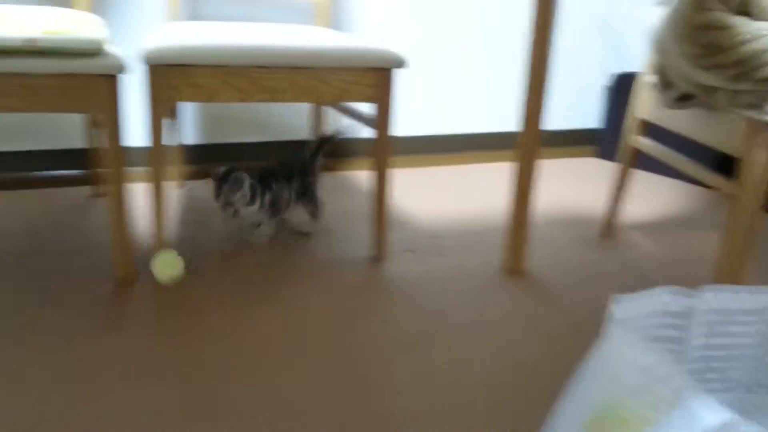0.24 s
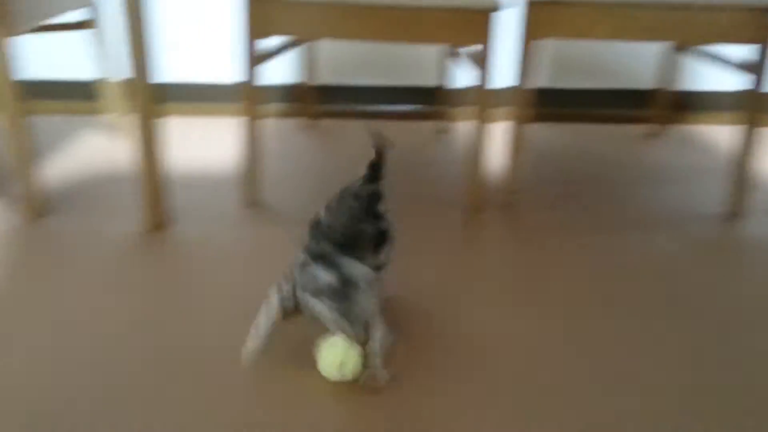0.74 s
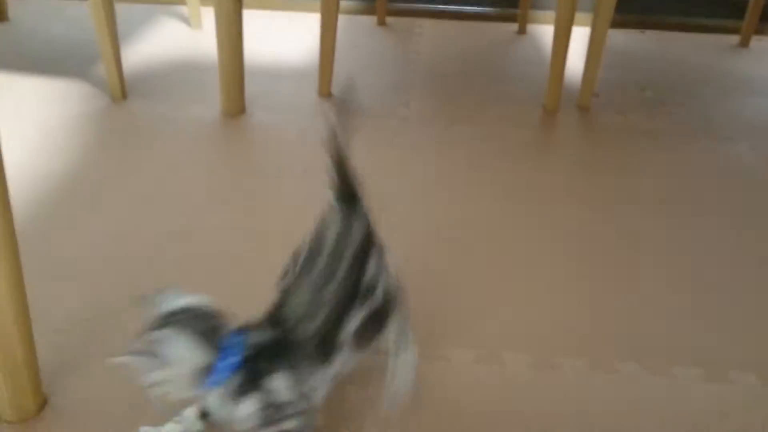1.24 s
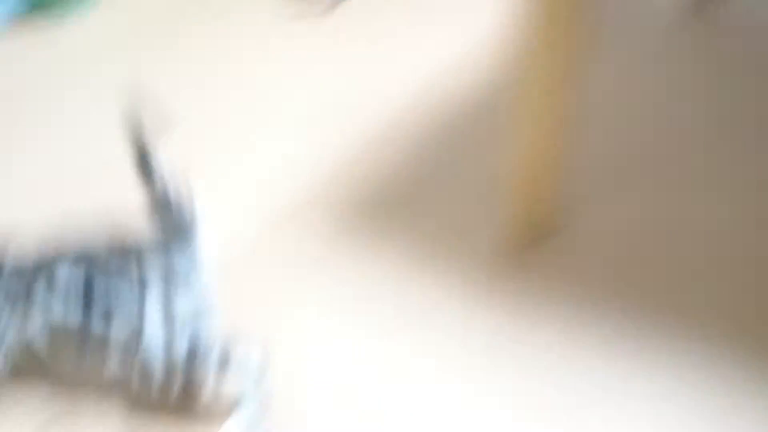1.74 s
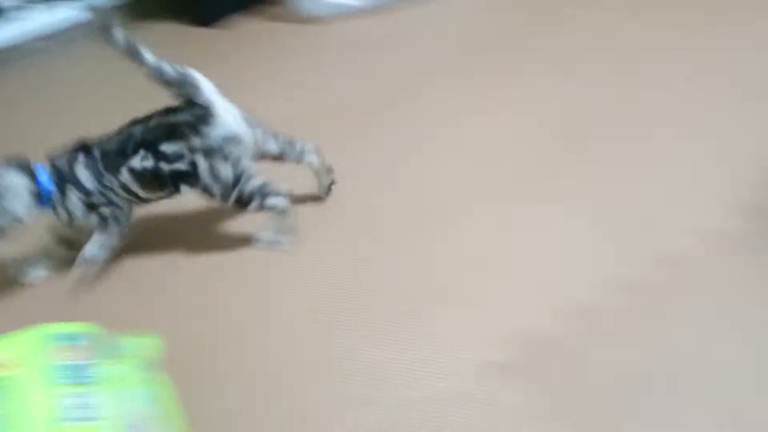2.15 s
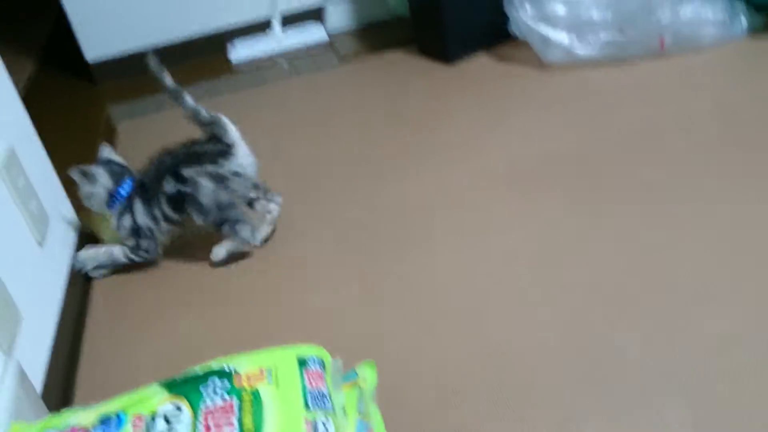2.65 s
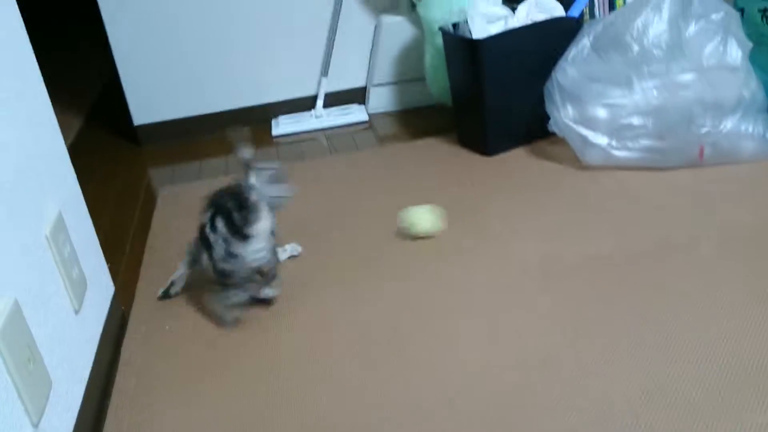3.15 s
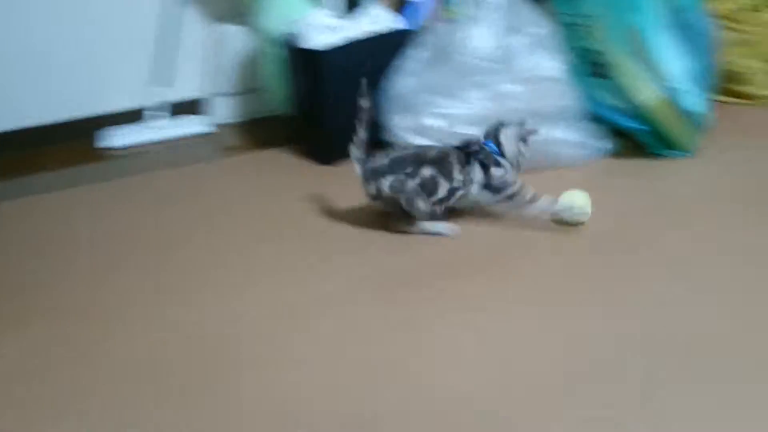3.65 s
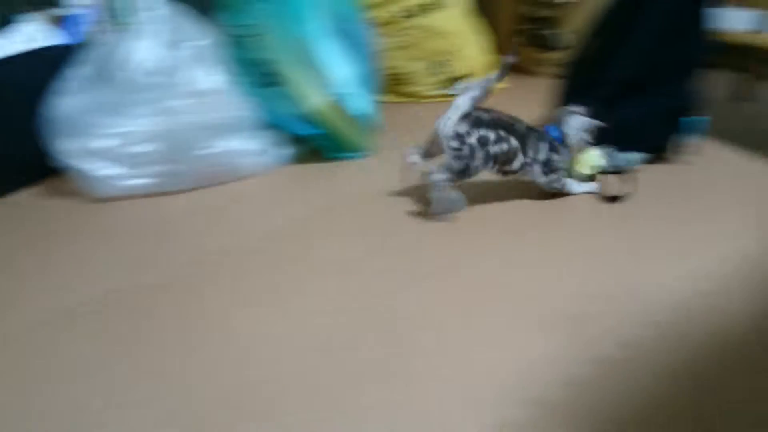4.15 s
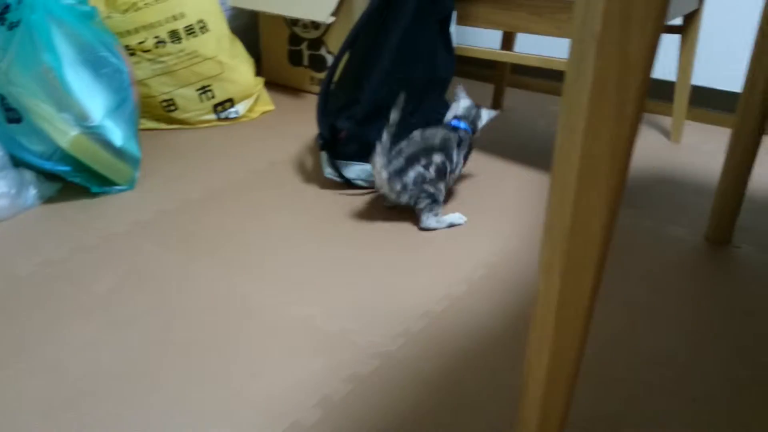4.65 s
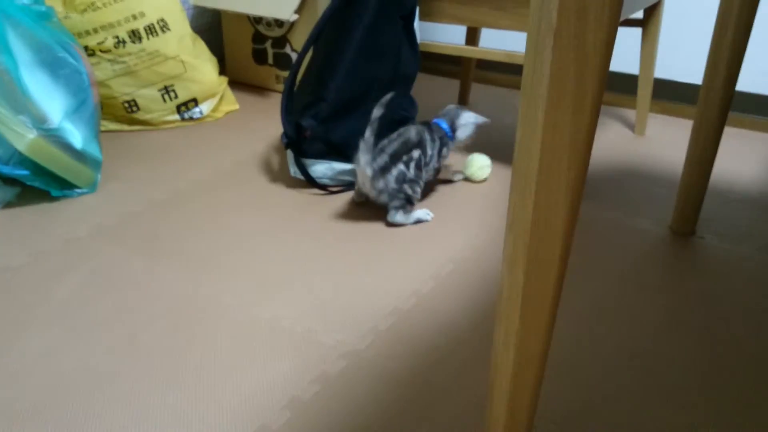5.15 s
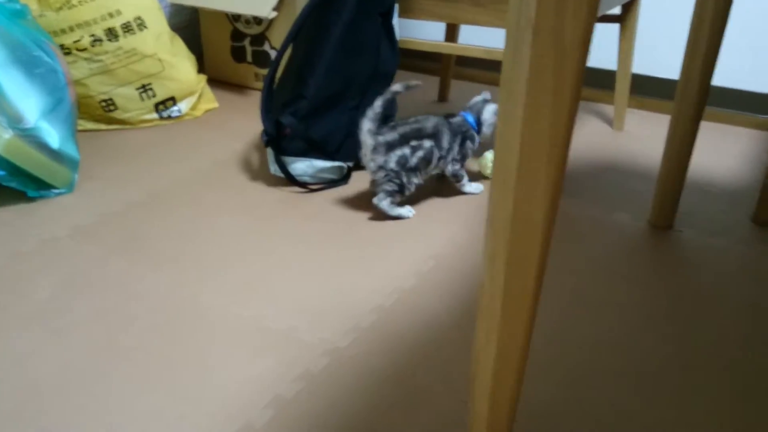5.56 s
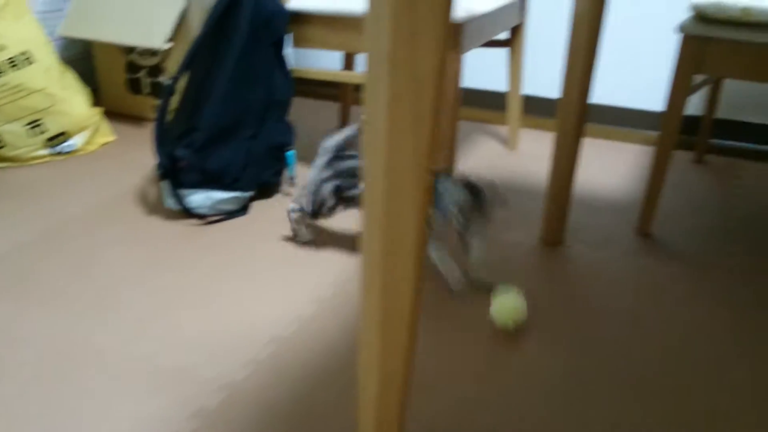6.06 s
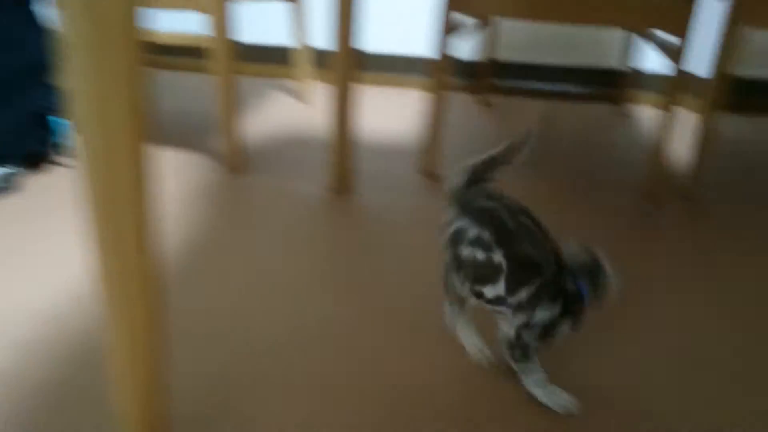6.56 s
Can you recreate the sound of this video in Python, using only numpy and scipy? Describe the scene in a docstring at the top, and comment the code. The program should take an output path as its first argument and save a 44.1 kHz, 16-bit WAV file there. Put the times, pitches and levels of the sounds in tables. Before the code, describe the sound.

Close in a small living room, light paws land with dull thumps and brush a mat with hissy strokes. Claws snap brightly, a ball is knocked and scuffed, and a small collar bell clacks and jingles unevenly. After a strong jingle midway, the movement dwindles to faint ticks and near silence, then a final quick dash stirs the bell again. Two microphones catch short room echo and low hiss.

```python
"""A pellet bell jingles close by, with claw ticks and soft thumps: a kitten bounds after a soft ball.
The place is a small living room with floor mats, heard by two microphones near the kitten.
The bell is struck and rolling contacts driving the shell's modes; claws are short bright noise bursts.
Scuffs and rubbing are showers of tiny contacts, and each thump is a decaying low swing with a soft push.
Every source but the still room's hiss reaches both microphones directly and by the room's echo."""
import sys
import numpy as np
from scipy import signal
from scipy.fft import rfft, irfft, next_fast_len
from scipy.io import wavfile
from scipy.ndimage import uniform_filter1d, map_coordinates

SR = 44100
rng = np.random.default_rng(int(sys.argv[2]) if len(sys.argv) > 2 else 0)


def digitize_waveform(pressure):
    """Quantize a signal to 16-bit integers and store it at the path in sys.argv[1].

    Rows of a 2-D input are taken as channels; values are limited to [-1, 1].
    """
    field = np.atleast_2d(pressure).T
    bounded = np.clip(field, -1, 1)
    quanta = np.round(bounded * 32767).astype(np.int16)
    wavfile.write(sys.argv[1], SR, quanta)


N = 300762
T = np.arange(N) / SR  # time in seconds

# Hiss of the still room and microphones. Each row: frequency in Hz, relative density in dB per Hz.
HISS_COLOUR = [(25, -23), (60, 0.5), (150, -6.5), (400, -13), (1000, -12.5), (3000, -7.5), (4300, -19),
               (6500, -15), (10000, -22), (16000, -44)]
HISS_DB = -71.5
# Colour of the room's echo. Each row: frequency in Hz, level in dB.
ECHO_COLOUR = [(100, -0.5), (1000, 4.5), (5000, 2), (10000, 2), (16000, 2)]
ROOM_T60_S = 0.34
# Where the kitten is. Each row: time in seconds, left minus right in dB.
KITTEN_BEARING = [(0, -1), (.8, 0.5), (1.55, 2), (2.1, -1.5), (2.5, 0.5), (3.2, 0), (3.8, -1.5), (4.4, -1),
                  (5.2, -0.5), (5.9, 2), (6.4, -1.5), (6.8, -0.5)]
# How busily the kitten moves. Each row: time in seconds, level of its light rustle in dB.
BUSTLE_LEVEL = [(0, -50), (.22, -58.5), (.5, -48.5), (.76, -58), (1.05, -50.5), (1.42, -56), (1.7, -50),
                (2.5, -55), (2.98, -60.5), (3.15, -56), (3.9, -50), (4.35, -54), (4.5, -60), (4.9, -70.5),
                (5.25, -63.5), (5.7, -74), (6.3, -53), (6.8, -64.5)]

# Thumps of paws and of the ball on the padded floor and door. Each row: start in seconds, level in dB, middle
# of the falling pitch in Hz.
FLOOR_THUMPS = [(0.01, -39.5, 103), (0.174, -51, 92), (0.296, -43.5, 113), (0.414, -46, 79),
                (0.512, -44, 95), (0.607, -30.5, 77), (0.813, -41.5, 115), (1.118, -40, 91),
                (1.261, -43, 79.6), (1.343, -38, 98), (1.452, -59, 94), (1.584, -41, 79),
                (1.721, -37.5, 99), (1.815, -49, 100), (2.063, -36.5, 99), (2.204, -42, 122),
                (2.362, -51, 122), (2.435, -45.5, 84.5), (2.806, -49, 152), (3.28, -53, 113),
                (3.502, -49.5, 85), (3.681, -51, 93), (4.031, -42, 84), (4.143, -41.5, 87),
                (4.218, -46, 107), (4.278, -42, 86), (4.388, -46, 75), (4.493, -52, 77), (4.688, -57, 77),
                (6.072, -49.5, 105), (6.139, -52, 100), (6.36, -62, 107), (6.559, -47.5, 74),
                (6.695, -46, 106), (6.761, -53, 81)]
# Colour of a paw's soft push. Each row: frequency in Hz, level in dB.
PUSH_COLOUR = [(45, 0), (85, 6), (190, -9.5), (300, -16), (450, -18), (800, -26), (1500, -21.5),
               (4000, -35)]

# Strokes of a paw or the flank over the mat.
# Each row: start in seconds, length in seconds, rub level in dB, fine bristle hiss level in dB.
MAT_STROKES = [(0.0, 0.015, -53, -54), (0.13, 0.03, -53, -43), (0.265, 0.014, -46, -46),
               (0.405, 0.098, -49.5, -39.5), (0.565, 0.11, -48.5, -39.5), (0.795, 0.037, -49.5, -43),
               (0.872, 0.036, -45.5, -38.5), (0.93, 0.071, -63, -41.5), (1.1, 0.031, -50, -42),
               (1.205, 0.054, -56, -36.5), (1.335, 0.012, -41.5, -37), (1.45, 0.15, -68.5, -48.5),
               (1.55, 0.033, -49.5, -42), (1.61, .14, -51.5, -44.5), (1.76, 0.086, -52, -41),
               (1.88, 0.02, -45.5, -59), (2.04, 0.053, -46.5, -41), (2.2, 0.038, -73, -43),
               (2.295, 0.077, -57.5, -43), (2.385, .15, -56.5, -50), (2.61, 0.032, -60, -44.5),
               (2.8, 0.069, -55.5, -44), (3.028, 0.086, -65, -45.5), (3.18, 0.12, -60, -49),
               (3.51, 0.074, -53.5, -38.5), (3.665, 0.085, -63, -43.5), (3.855, 0.05, -54.5, -44),
               (3.98, 0.043, -62, -43), (4.135, 0.065, -51, -37.5), (4.235, 0.12, -52, -38.5),
               (4.64, 0.079, -59, -50), (4.955, 0.032, -69, -57), (5.03, 0.12, -89, -59.5),
               (5.185, 0.07, -75, -53.5), (5.73, 0.052, -70, -54.5), (5.81, 0.021, -66, -60),
               (5.98, 0.022, -69, -49), (6.058, 0.018, -62, -42.5), (6.18, 0.069, -83, -44),
               (6.35, 0.086, -53, -44), (6.525, 0.018, -52.5, -44.5), (6.69, 0.058, -58, -49),
               (6.765, 0.056, -72, -49)]
STROKE_ATTACK_S, STROKE_RELEASE_S = 0.0077, 0.018
# Colours of the rub and of the bristle hiss. Each row: frequency in Hz, level in dB.
RUB_COLOUR = [(150, 0.5), (400, -10.5), (800, -10.5), (1400, -8.5), (2200, -2.5), (3400, 1.5), (4300, -3),
              (6000, 0.5), (8000, -7.5), (16000, -48)]
BRISTLE_COLOUR = [(2000, -18), (4300, -7), (5200, 5.5), (6300, 10), (8000, 1.5), (9200, 4), (10500, 2),
                  (12500, 4.5), (13600, 1.5), (15300, 4.5), (16500, 13)]
BUSTLE_RUB_DB, BUSTLE_BRISTLE_DB = -6.5, 2.5  # against the light rustle

# Scuffs and knocks of paw and ball. Each row: start in seconds, level in dB, pitch in Hz, T60 in seconds.
SCUFF_EVENTS = [(0.396, -37, 3240, 0.014), (0.449, -57, 1660, 0.15), (0.627, -44, 1830, 0.051),
                (0.811, -51.5, 2220, 0.059), (0.878, -47, 1910, 0.073), (1.254, -47.5, 3070, 0.035),
                (1.346, -42.5, 2580, 0.035), (1.541, -53.5, 1440, 0.017), (1.715, -52, 1510, 0.025),
                (1.791, -43.5, 1480, 0.018), (1.796, -38, 3160, 0.018), (1.883, -43.5, 1550, 0.062),
                (2.053, -57.5, 960, 0.018), (2.431, -49.5, 1960, 0.014), (2.738, -46, 2870, 0.027),
                (2.808, -42.5, 2920, 0.017), (3.28, -53.5, 1260, 0.016), (3.446, -59, 2500, 0.031),
                (4.017, -45, 2750, 0.1), (4.123, -56, 1180, 0.13), (4.497, -58, 810, 0.1),
                (5.75, -59.5, 3400, 0.12), (6.069, -52, 2570, 0.031), (6.073, -67, 328, 0.043),
                (6.532, -55.5, 1900, 0.045), (6.696, -61, 274, 0.039)]
# Claws catching and snapping free. Each row: start in seconds, peak in dB before placing, pitch in Hz.
CLAW_SNAPS = [(0.5921, -23.5, 11500), (0.6477, -29, 13900), (0.8102, -28.5, 13500), (0.9804, -23.5, 11600),
              (1.1107, -27, 15600), (1.2551, -36, 12700), (1.335, -29, 15300), (1.4415, -31.5, 12100),
              (1.5626, -20, 13500), (1.7953, -28, 12700), (2.3187, -25, 12200), (2.4333, -28.5, 12000),
              (2.459, -26, 12200), (2.4822, -27, 11400), (2.5605, -19, 10600), (2.563, -33, 10900),
              (2.6037, -30.5, 12100), (2.6074, -22, 11400), (2.7303, -31, 11400), (3.3314, -27, 11970),
              (3.454, -26, 12900), (3.487, -35, 12500), (3.5583, -25, 13700), (3.734, -26.5, 12500),
              (3.7917, -29, 11700), (3.9897, -31.5, 11100), (4.9709, -36.5, 11650), (5.056, -36.5, 12500),
              (5.134, -38, 12900), (5.8256, -34, 12100), (6.0586, -38, 13100), (6.345, -28.5, 12300),
              (6.3915, -26, 12400)]

# Pellet striking the collar bell. Each row: start in seconds, ring level in dB, hard clack level in dB.
PELLET_STRIKES = [(0.044, -52, -25.5), (0.094, -43, -55), (0.138, -51, -43), (0.258, -23, -18),
                  (0.274, -28, -30), (0.279, -26, -19), (0.328, -33.5, -52), (0.418, -30, -32),
                  (0.563, -31, -26), (0.583, -33, -41), (0.629, -27.5, -35), (0.664, -48, -25),
                  (0.85, -34, -34), (0.879, -28, -29), (0.929, -36.5, -41), (1.192, -34.5, -37),
                  (1.213, -35, -26.5), (1.224, -22, -26), (1.268, -36, -42), (1.456, -27.5, -36),
                  (1.83, -36, -28), (1.902, -32, -19.5), (1.978, -46, -45), (2.181, -41, -42),
                  (2.242, -34, -37.5), (2.505, -36.5, -51), (2.526, -44, -46), (3.174, -38, -35),
                  (3.19, -33, -37), (3.408, -30, -38), (3.497, -32.5, -36), (3.546, -18.5, -31),
                  (3.572, -29, -15.5), (3.597, -39, -28), (3.714, -37, -27), (3.82, -40, -26),
                  (3.944, -55, -39), (4.152, -26.5, -31), (4.157, -30, -14), (4.393, -23.5, -30),
                  (4.421, -35.5, -47), (4.573, -43.5, -59), (5.075, -53, -63), (5.13, -52, -63),
                  (5.266, -53, -46), (5.425, -63, -54), (5.555, -70, -58), (5.98, -52.5, -45),
                  (6.069, -67, -30), (6.182, -48, -28), (6.205, -35.5, -31), (6.552, -64, -33.5),
                  (6.694, -52, -35), (6.766, -39, -40), (6.79, -27, -27.5)]
# Pellet rolling round the shell.
# Each row: start in seconds, length in seconds, ring level in dB, clack level in dB.
PELLET_ROLLS = [(0.0, 0.18, -58, -53), (.258, 0.034, -45, -39), (.563, 0.052, -41, -48),
                (1.04, 0.23, -56, -59), (1.48, 0.36, -48.5, -56), (1.94, 0.17, -53, -47),
                (3.03, 0.12, -50.5, -80), (3.51, 0.089, -46, -39), (3.67, 0.21, -51, -47),
                (4.05, 0.21, -53, -71), (4.18, 0.214, -65, -50), (5.17, 0.11, -73, -70),
                (6.21, 0.049, -57, -52), (6.37, 0.044, -73, -55)]
ROLL_ATTACK_S, ROLL_RELEASE_S = 0.017, 0.022
STIR_RING_DB, STIR_CLACK_DB = -17.5, -19  # pellet stirred by the kitten's bustle, against its rustle
# Modes of the bell before each strike shifts them: the shell's lowest, its overtone pair,
# and the pellet's short clack in the slotted shell. Each row: frequency in Hz, level in dB, T60 in seconds.
SHELL_MODE = [(4903, 0, .06)]
SHELL_OVERTONES = [(12102, 0, .055), (12425, -2, .045)]
CLACK_MODES = [(5230, -13, 0.066), (5363, 1, 0.027), (5930, 6.5, 0.01), (6200, -2, 0.0075)]
# Overtones against the lowest mode.
STRUCK_BRIGHT_DB, ROLLING_BRIGHT_DB = -11, -9
# The swinging bell beams its low ring to one side, on top of the kitten's bearing.
# Each row: time in seconds, left minus right in dB.
BELL_BEAM = [(0, -4), (.3, 3), (.6, 1), (1.22, -2), (1.46, 6.5), (1.9, 2), (2.75, 11.5), (3.1, -2.5),
             (3.42, 13), (3.58, 1.5), (4.16, 5), (4.4, 11.5), (4.6, 9), (4.9, 5.5), (6.1, 0), (6.8, 6)]

TOP_HZ = 15900  # upper limit of the microphones' band
OFFSET = -0.0005  # steady offset, as a fraction of full scale


def undb(db):
    """Decibels to gain."""
    return 10 ** (np.asarray(db) / 20)


def unit(x):
    """Scale to rms 1."""
    return x / np.sqrt(np.mean(x ** 2))


def curve(table):
    """The second column of a timed table, interpolated sample by sample."""
    s, values = np.transpose(table)
    return np.interp(T, s, values)


def colour(x, points):
    """Filter by an outline in Hz and dB, straight between points over log frequency."""
    hz, db = np.transpose(points)
    length = x.shape[-1]
    size = next_fast_len(length)
    f = np.maximum(np.arange(size // 2 + 1) * SR / size, 1)
    gain = undb(np.interp(np.log(f), np.log(hz), db))
    return irfft(rfft(x, size) * gain, size)[..., :length]


def band(x, low_hz, high_hz, order):
    """Band-pass; a higher order gives steeper skirts."""
    edges = np.clip([low_hz, high_hz], 20, 0.45 * SR)
    return signal.sosfilt(signal.butter(order, edges, "band", fs=SR, output="sos"), x)


def add(track, s, sound):
    """Mix a sound into a track at time s."""
    i = max(int(s * SR), 0)
    part = sound[..., :max(N - i, 0)]
    track[..., i:i + part.shape[-1]] += part


def decay(t, t60):
    """Exponential decay that falls 60 dB in t60 seconds."""
    return np.exp(-np.log(1000) * t / t60)


def note(modes, tune=1, damping=1):
    """Decaying modes after one blow, peak 1."""
    t = T[:SR // 6]
    wave = np.zeros(len(t))
    for hz, db, t60 in modes:
        wave += undb(db) * np.sin(2 * np.pi * hz * tune * t) * decay(t, t60 / damping)
    return wave / np.abs(wave).max()


def ring(contacts, modes):
    """Drive the modes with a train of contacts, rms 1."""
    return unit(signal.fftconvolve(contacts, note(modes))[:N])


def grains(per_s, spread_db):
    """Random tiny contacts of uneven size and either sign, rms 1."""
    sizes = undb(spread_db * np.minimum(rng.exponential(size=N), 4))
    signs = rng.choice([-1, 1], N)
    return unit((rng.random(N) < per_s / SR) * signs * sizes)


def fits(rate, depth_db):
    """A gain that comes in uneven fits and starts, about rate a second, rms 1."""
    held = rng.standard_normal(N)[np.cumsum(rng.random(N) < rate / SR)]
    smooth = uniform_filter1d(np.clip(held, -1.7, 1.7), size=90)
    return unit(undb(depth_db * smooth))


def swells(table, attack_s, release_s):
    """Attack, hold and release for each row; one gain curve for each of the two level columns."""
    out = np.zeros((2, N))
    for s, length, *db in table:
        t = T[:int((length + 0.3) * SR)]
        shape = np.minimum(t / attack_s, 1) * np.exp(-np.maximum(t - length, 0) / release_s)
        add(out, s, undb(db)[:, None] * shape)
    return out


def bustle():
    """Gain of the kitten's light movements."""
    return undb(curve(BUSTLE_LEVEL))


def echo(x, count=10):
    """The room answers differently as kitten and listener move: overlapping stretches ring with own tails."""
    t, step = T[:SR // 2], N // count
    early_boost = 1 + 4.6 * np.exp(-t / 0.0027)
    onset = np.clip(t / 0.0015 - 0.5, 0, 1)
    fade = decay(t, ROOM_T60_S) * early_boost * onset
    tails = colour(rng.standard_normal((count + 2, 2, len(t))), ECHO_COLOUR) * fade
    tails /= np.sqrt(np.mean(np.sum(tails ** 2, axis=-1)))
    out = np.zeros((2, N))
    for k, tail in enumerate(tails):
        i = np.arange(max((k - 1) * step, 0), min((k + 1) * step, N))
        if len(i):
            stretch = x[i] * np.cos(np.pi / 2 * (i / step - k))  # equal-power crossfade
            add(out, i[0] / SR, signal.fftconvolve(stretch[None], tail, axes=1))
    return out


def place(x, wet_db, left_db):
    """Direct sound at two microphones, its lag wandering as the kitten darts about, plus the room's echo."""
    # lag in samples, opposite at the two sides, with a fresh target every quarter second
    lag = np.interp(T, np.arange(29) / 4, rng.uniform(-5, 5, 29))
    direct = np.array([map_coordinates(x, [np.arange(N) + side * lag], order=2) for side in (1, -1)])
    balance_db = np.array([[1], [-1]]) * (left_db + curve(KITTEN_BEARING)) / 2
    return (direct + undb(wet_db) * echo(x)) * undb(balance_db)


def still_room():
    """Faint even hiss, unrelated in the two microphones."""
    return undb(HISS_DB) * unit(colour(rng.standard_normal((2, N)), HISS_COLOUR))


def thumps(rise_s=0.0039, push_s=0.034, sag=0.17, push_db=-7.5, settle=0.2, settle_s=0.37):
    """A paw or the ball thumps down: the floor swings for a few cycles, slower as the weight settles, and the
    mat is crushed softly."""
    swings, push_gain, t = np.zeros(N), np.zeros(N), T[:SR // 2]
    phases = rng.uniform(0, 2 * np.pi, len(FLOOR_THUMPS))
    swing_shape = t / rise_s * np.exp(1 - t / rise_s)
    push_shape = (1 - np.exp(-t / 0.0025)) * (np.exp(-t / push_s) + settle * np.exp(-t / settle_s))
    pitch_fall = 1 + sag * (2 * np.exp(-t / 0.038) - 1)
    for (s, db, hz), phase in zip(FLOOR_THUMPS, phases):
        turns = np.cumsum(hz * pitch_fall) / SR
        add(swings, s - 0.003, undb(db) * swing_shape * np.sin(2 * np.pi * turns + phase))
        add(push_gain, s, undb(db + push_db) * push_shape)
    push = push_gain * unit(colour(rng.standard_normal(N), PUSH_COLOUR))
    return place(swings + push, wet_db=-7, left_db=1.5)


def sliding():
    """Pads rub and fur brushes over the mat's grain, as dense tiny contacts that catch and let go."""
    rubbing, brushing = swells(MAT_STROKES, STROKE_ATTACK_S, STROKE_RELEASE_S)
    rub_gain = np.hypot(rubbing, undb(BUSTLE_RUB_DB) * bustle())
    bristle_gain = np.hypot(brushing, undb(BUSTLE_BRISTLE_DB) * bustle())
    catch = fits(60, 2.6)
    rub = unit(colour(grains(5000, 4.2) * catch, RUB_COLOUR)) * rub_gain
    bristle = unit(colour(grains(7000, 4.2) * catch, BRISTLE_COLOUR)) * bristle_gain
    return place(rub, wet_db=-4, left_db=3) + place(bristle, wet_db=-3.5, left_db=-2.5)


def scuffs(rise_s=0.00012, spread=1.364):
    """A paw or the ball knocks, then skids: a short run of stick-slip grains around one pitch."""
    out, t, slips = np.zeros(N), T[:SR // 5], grains(4000, 0.55)
    for s, db, hz, t60 in SCUFF_EVENTS:
        skid = np.roll(slips, -int(s * SR))[:len(t)]
        skid = skid * (1 - np.exp(-t / rise_s)) * decay(t, t60)
        skid[0] += 7  # the knock
        pitched = band(skid, hz / spread, hz * spread, order=2)
        add(out, s, undb(db) * pitched * np.sqrt(SR / hz))  # makes up for the narrower band at low pitch
    return place(out, wet_db=-2.5, left_db=6.5)


def claws(width=0.15):
    """Each snap is a bright burst about two milliseconds long, its band width set in log frequency."""
    out, t = np.zeros(N), T[:256]
    f = np.maximum(np.arange(129) * SR / 256, 1)
    for s, db, hz in CLAW_SNAPS:
        burst = rng.standard_normal(256) * t * np.exp(-t / 0.0006)
        burst = np.roll(burst, 16)  # room for the filter to ring ahead of the burst
        snap = irfft(rfft(burst) * np.exp(-0.5 * (np.log(f / hz) / width) ** 2))
        add(out, s - 0.0006, undb(db) * snap / np.abs(snap).max())
    return place(out, wet_db=-1, left_db=3)


def bell_strikes(bounce_s=0.0041):
    """The pellet hits the shell and chatters a few times; returns low and high tracks."""
    low, high = np.zeros(N), np.zeros(N)
    for s, ring_db, clack_db in PELLET_STRIKES:
        # pellet and fur lean on the shell, so every strike is detuned and its ring damped a little differently
        detune, damping = rng.uniform(-0.5, 0.5), rng.uniform(0.8, 1.4)
        add(low, s, undb(ring_db) * note(SHELL_MODE, 1 + 0.008 * detune, damping))
        clack = undb(clack_db) * note(CLACK_MODES, 1 + 0.04 * detune)
        overtone_db = ring_db + STRUCK_BRIGHT_DB
        overtone = undb(overtone_db) * note(SHELL_OVERTONES, 1 + 0.003 * detune, damping)
        # the five light rebounds stir only the clack and the overtones
        delays = np.cumsum(np.r_[0, bounce_s * rng.uniform(0.4, 1.4, 5)])
        for k, delay in enumerate(delays):
            size = undb(-2 - 2 * k) if k else 1
            add(low, s + delay, size * clack)
            add(high, s + delay, size * overtone)
    return low, high


def bell_rolling():
    """The pellet rolls on while the kitten moves, its small contacts driving the modes; low and high tracks."""
    stir = undb([[STIR_RING_DB], [STIR_CLACK_DB]]) * bustle()
    roll, rattle = swells(PELLET_ROLLS, ROLL_ATTACK_S, ROLL_RELEASE_S) + stir
    tumble = fits(30, 5)
    low = ring(grains(220, 3.6) * tumble, SHELL_MODE) * roll
    low += ring(grains(300, 4.0) * tumble, CLACK_MODES) * rattle
    high = undb(ROLLING_BRIGHT_DB) * ring(grains(220, 3.6) * tumble, SHELL_OVERTONES) * roll
    return low, high


def bell():
    """Struck and rolling bell; so small a shell radiates next to nothing away from its modes."""
    struck_low, struck_high = bell_strikes()
    rolling_low, rolling_high = bell_rolling()
    low = band(struck_low + rolling_low, 4650, 6900, order=4)
    high = band(struck_high + rolling_high, 11400, 13200, order=2)
    return place(low, wet_db=-4, left_db=curve(BELL_BEAM)) + place(high, wet_db=-2, left_db=6)


def scene():
    """Paws, claws and bell in the quiet room."""
    return still_room() + thumps() + sliding() + scuffs() + claws() + bell()


def record(dry):
    """Two microphones of opposite polarity, bass rolled off, a tiny steady offset, a steep cut at the top."""
    opposed = dry * np.array([[1], [-1]])
    heard = signal.sosfilt(signal.butter(2, 45, "high", fs=SR, output="sos"), opposed)
    top_cut = signal.ellip(10, 0.2, 70, TOP_HZ, fs=SR, output="sos")  # ripple, then stop-band depth, in dB
    return signal.sosfilt(top_cut, heard + OFFSET)


dry = scene()
out = record(dry)
digitize_waveform(out)
```